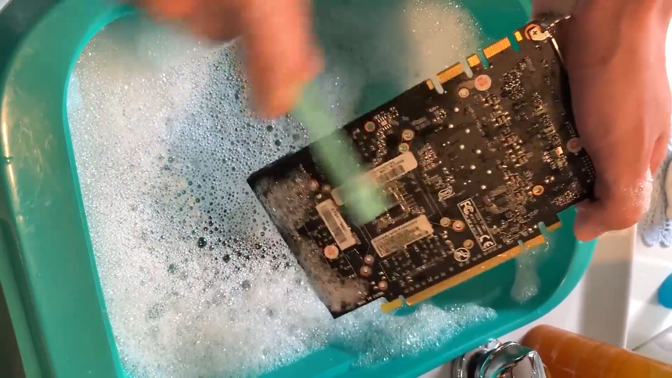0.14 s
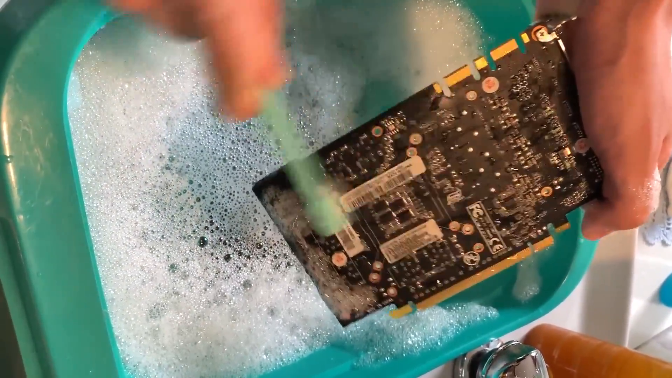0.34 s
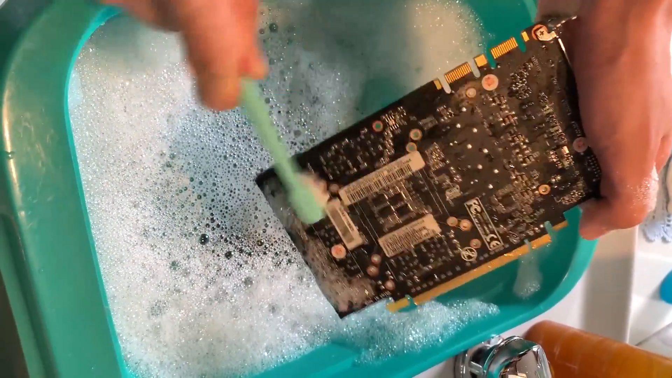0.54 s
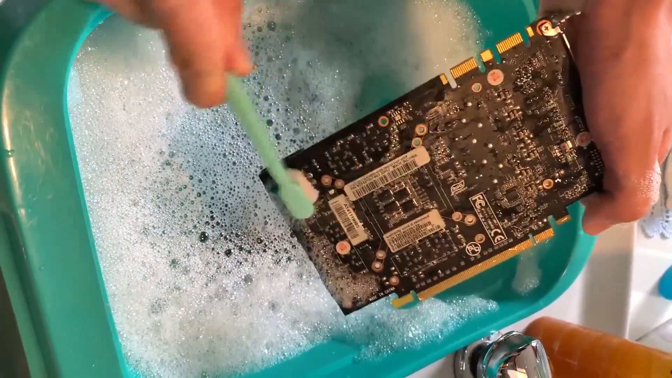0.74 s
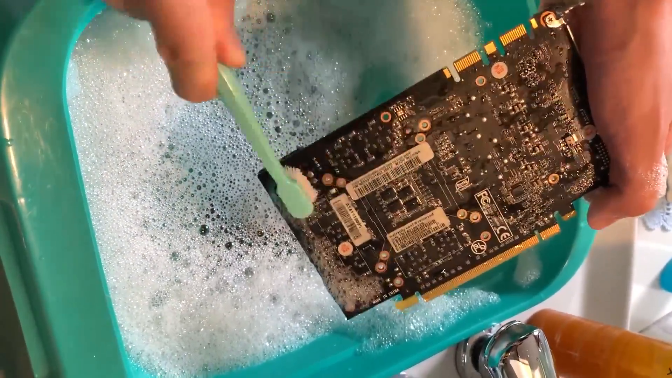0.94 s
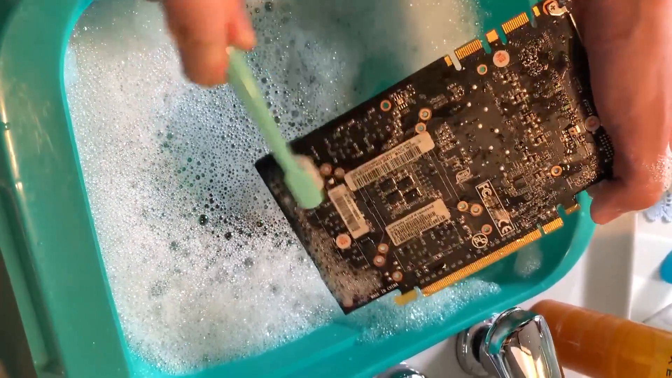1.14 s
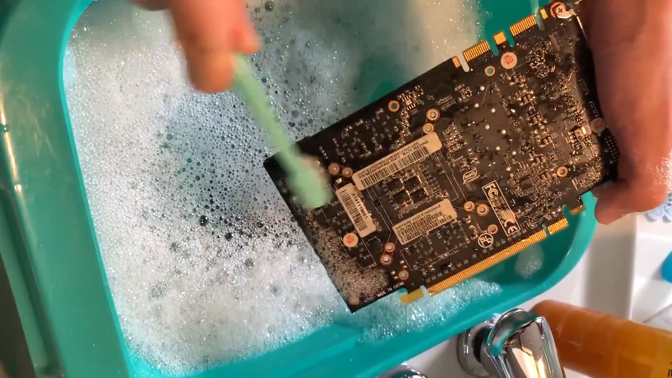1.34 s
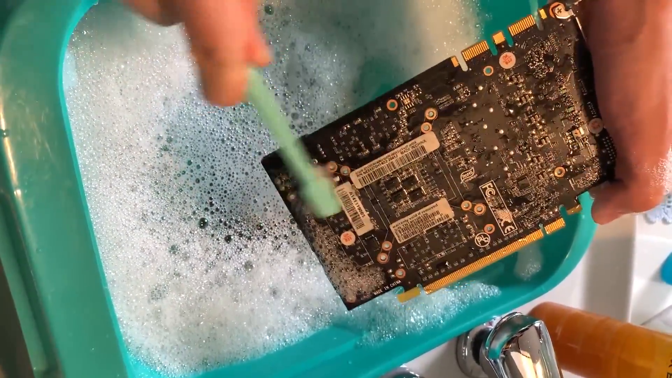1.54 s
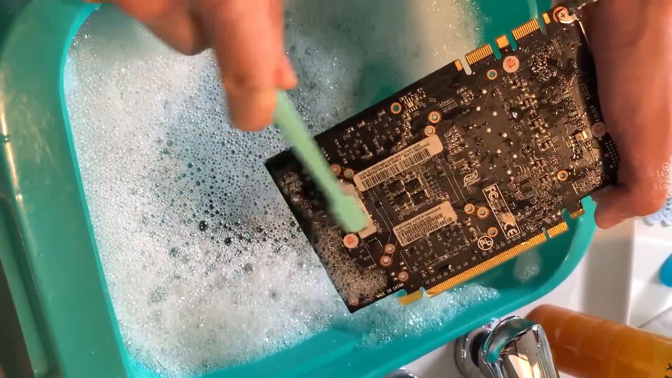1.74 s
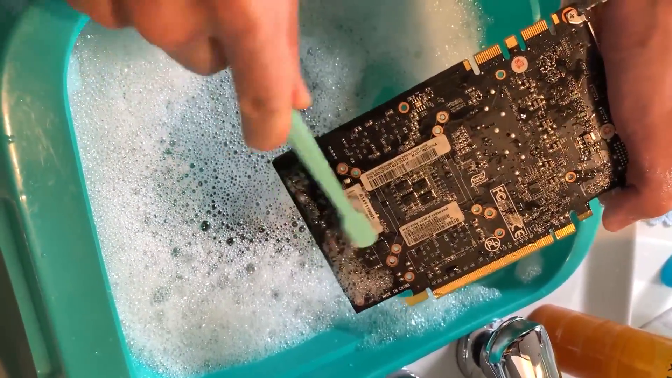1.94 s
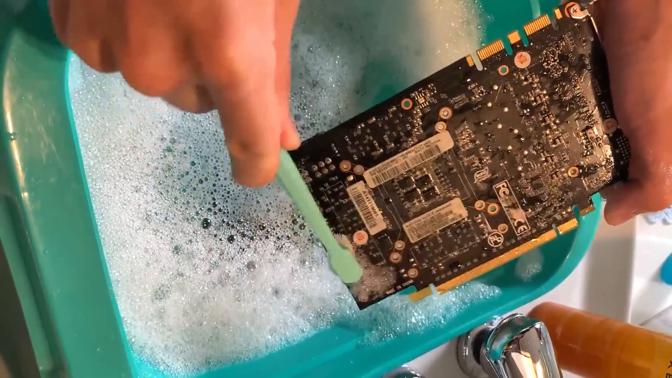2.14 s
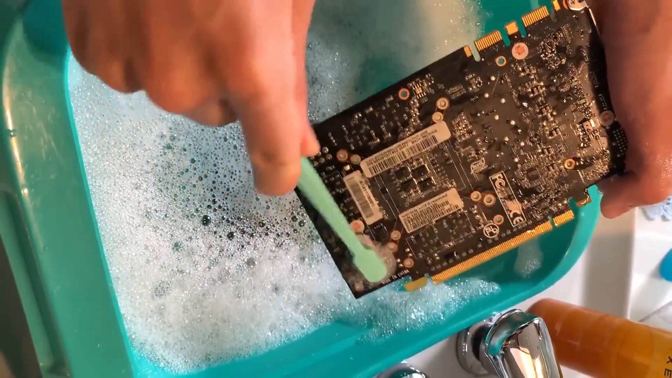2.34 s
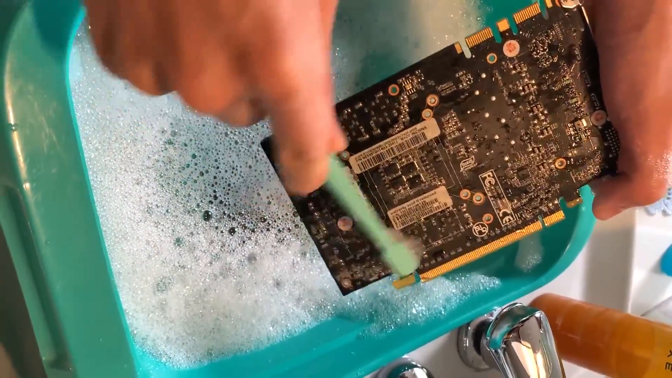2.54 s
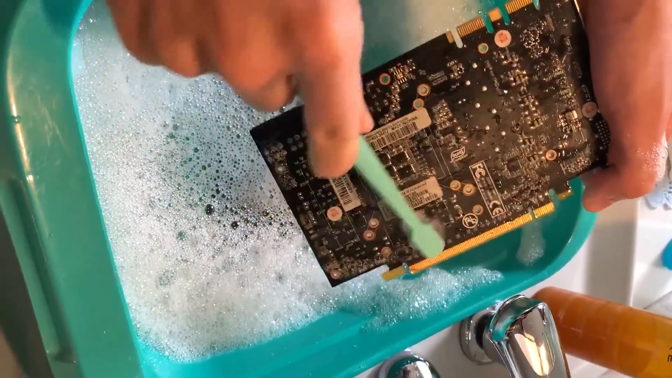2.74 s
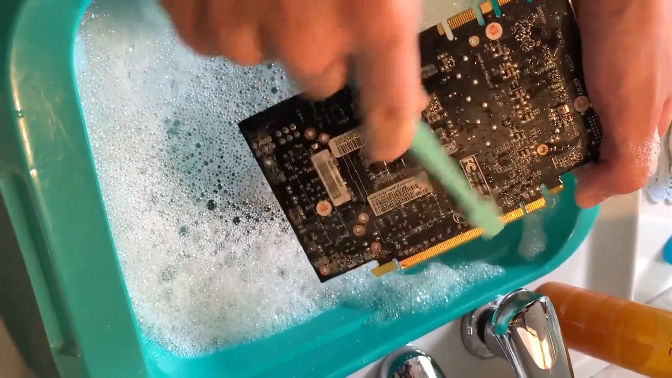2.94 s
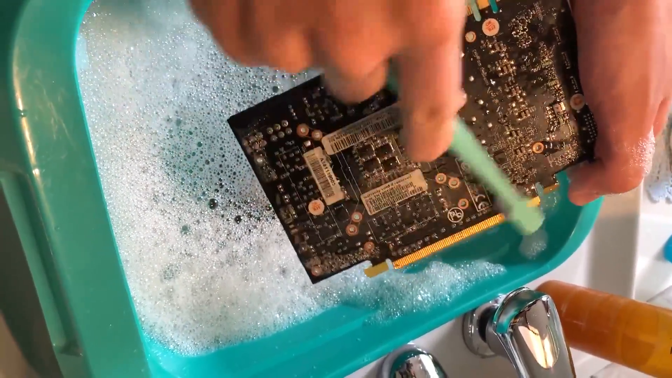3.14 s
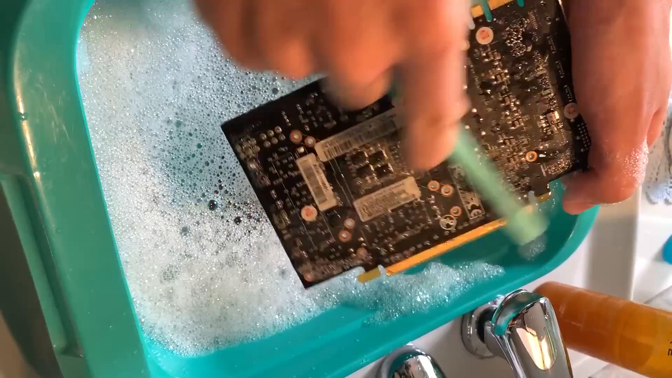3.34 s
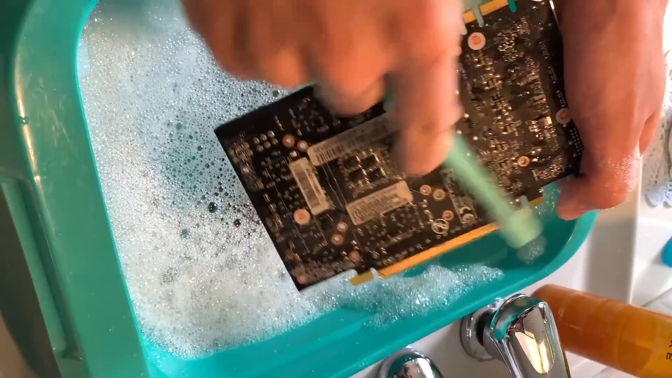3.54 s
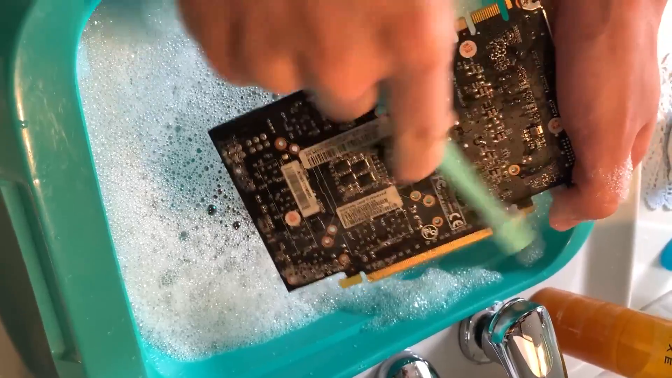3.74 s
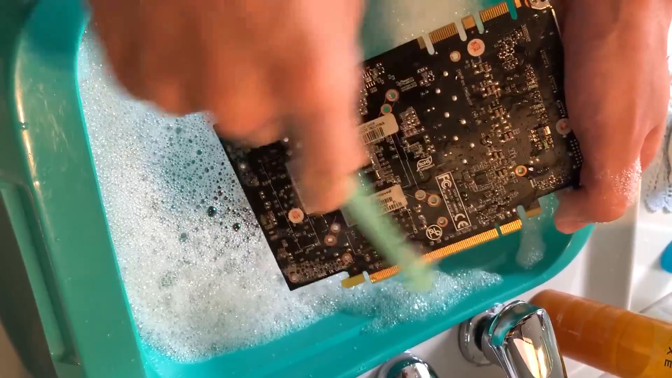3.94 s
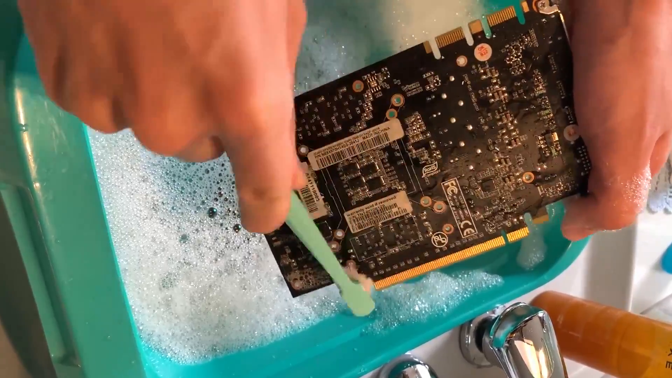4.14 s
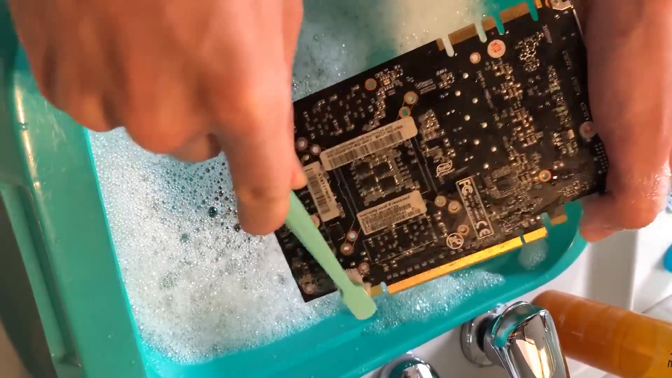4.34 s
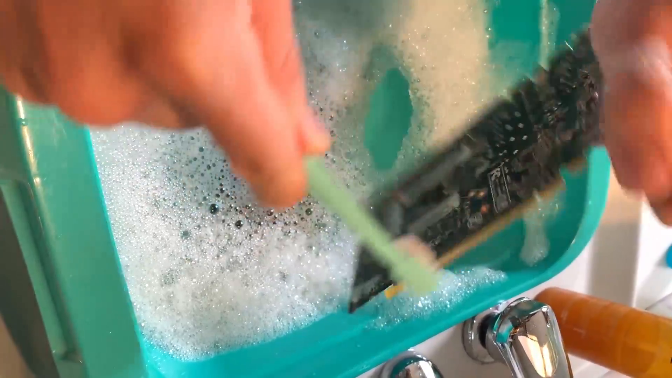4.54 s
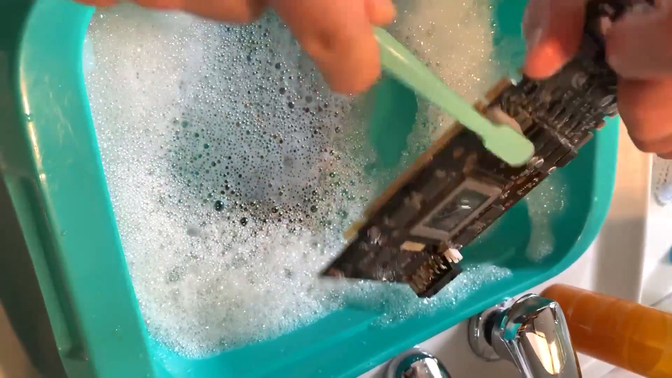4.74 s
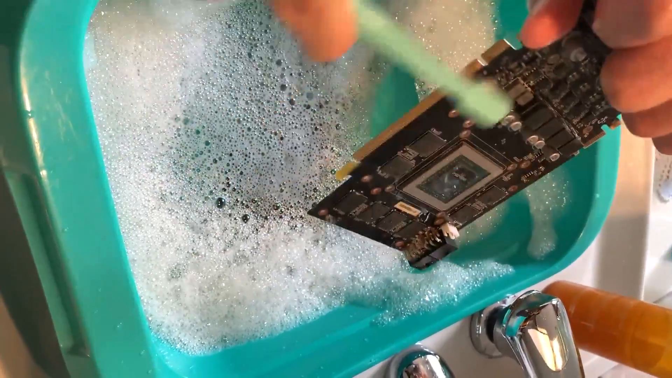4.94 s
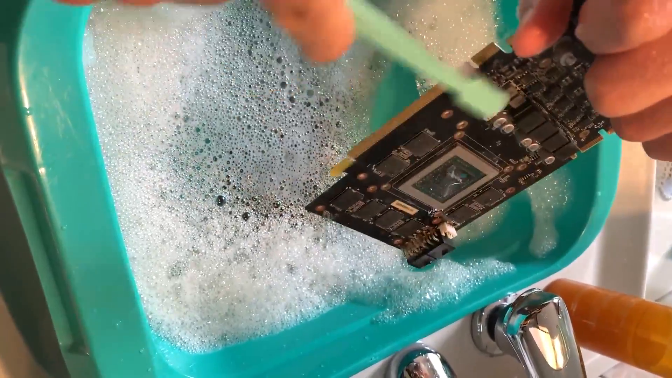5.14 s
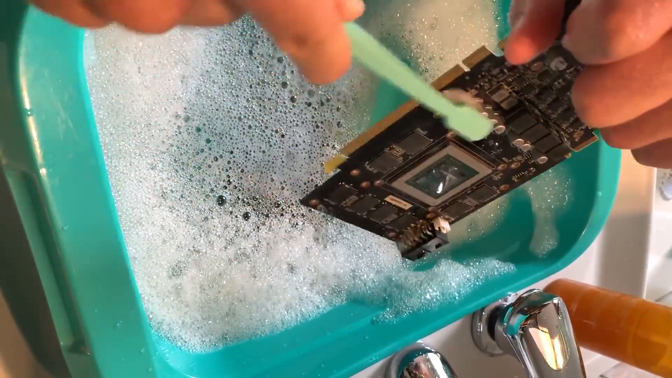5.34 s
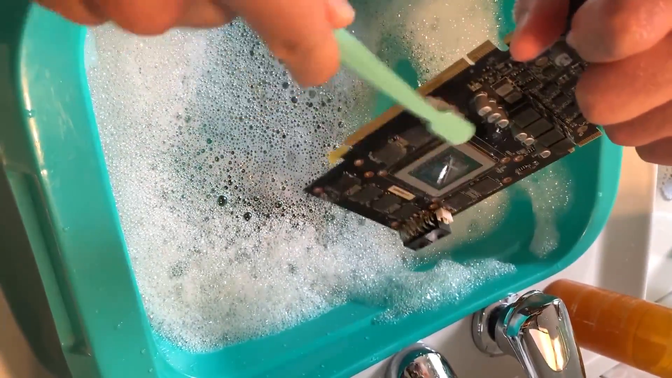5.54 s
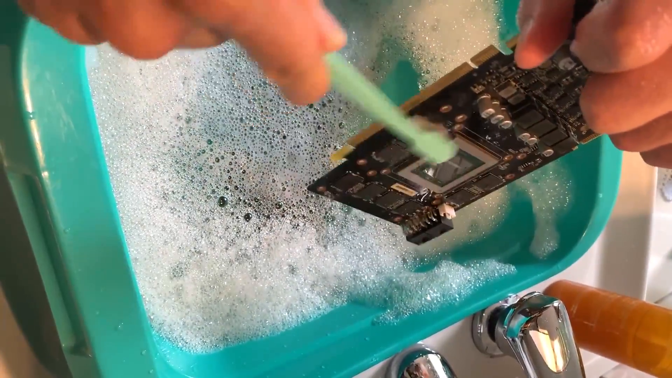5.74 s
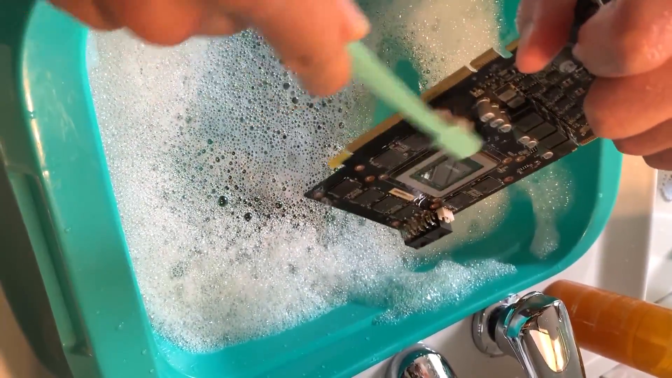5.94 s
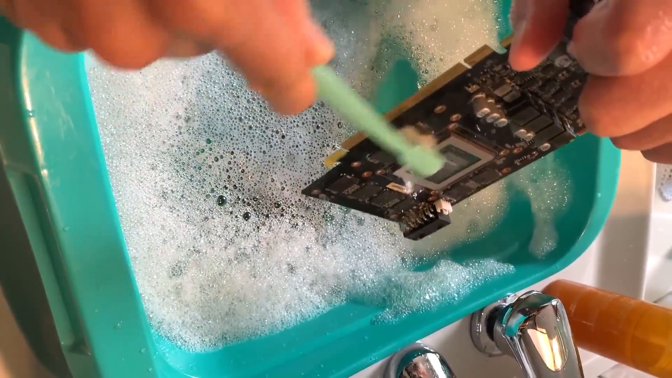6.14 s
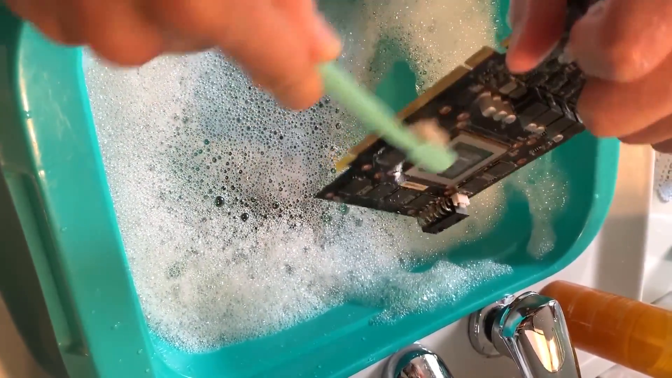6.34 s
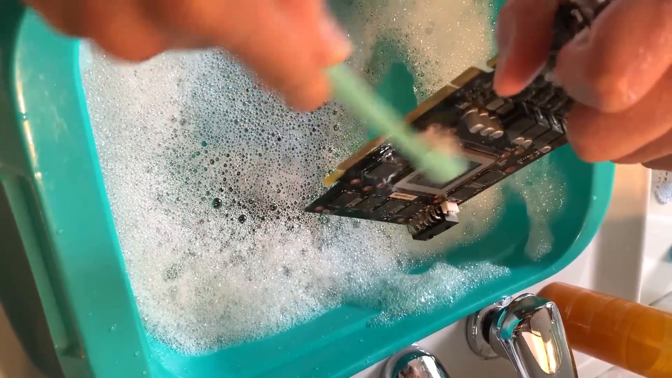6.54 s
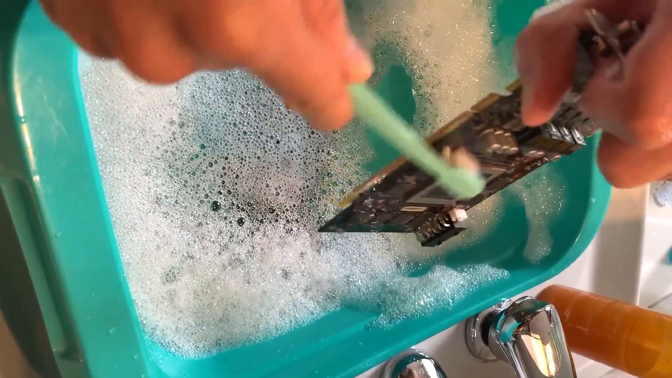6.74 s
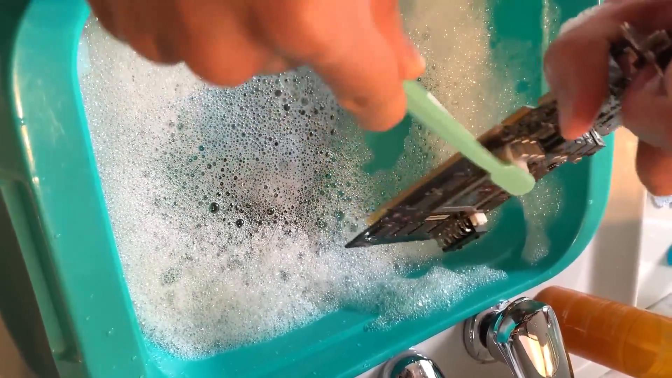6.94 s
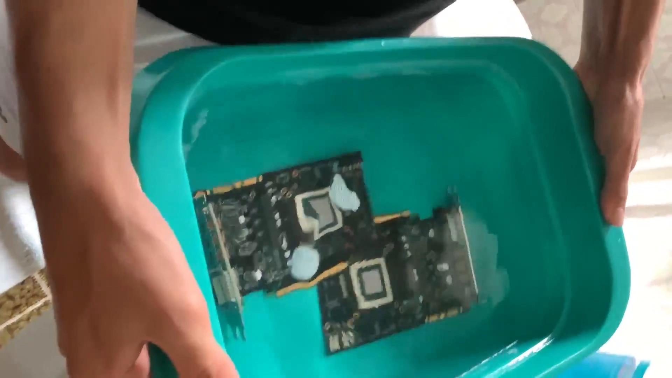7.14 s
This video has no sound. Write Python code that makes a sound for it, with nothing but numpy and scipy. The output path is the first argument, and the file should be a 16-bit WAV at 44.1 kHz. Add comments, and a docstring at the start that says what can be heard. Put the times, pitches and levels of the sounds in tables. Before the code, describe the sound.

Rapid bright bristle scrubbing on a wet circuit board, rasping and ticking, quieter after a turn, cutting to brief silence and gentle basin water.

```python
"""Close up, a plastic toothbrush scrubs a wet circuit board over a basin of suds, ten strokes a second.
It pauses as the board is turned. Bristles flick and hiss, snap over solder pins and set the board rasping.
The brush head knocks, soft bumps thud and faint whistles glide over room tone, hum and bursting foam.
After a moment of silence, water laps quietly in the basin. Two close microphone ports colour it all.
Noise bursts and random clicks make the rubbing and knocks; resonances make the board; glides make the whistles."""
import sys
import numpy as np
from scipy import signal
from scipy.fft import rfft, irfft, next_fast_len
from scipy.io import wavfile
from scipy.ndimage import uniform_filter1d

SR = 44100
rng = np.random.default_rng(int(sys.argv[2]) if len(sys.argv) > 2 else 0)


def put_to_file(sound):
    """Save the sound as 16-bit audio at rate SR, in the file named by the first command-line argument."""
    columns = np.atleast_2d(sound).T  # one column per channel
    safe = np.clip(columns, -1, 1)
    whole_steps = np.round(safe * 32767)
    wavfile.write(sys.argv[1], SR, whole_steps.astype(np.int16))


N = 321486
TIME = np.arange(N) / SR
SILENT_FROM, SILENT_TO = 7.047, 7.128  # s

# colour of bristles letting go, and of the foam: f/Hz, relative level/dB
BRISTLE_SPECTRUM = [(100, -40.5), (1500, -28.5), (3000, -21.5), (4200, -10.5), (5500, -5.5), (7500, -4.5),
                    (11000, -4.5), (14000, -3), (16000, -2)]
# treble tilt of the hiss about 11.5 kHz: t/s, tilt/dB per 6.3 kHz
HISS_TILT = [(0.08, 3.5), (2.25, -4.5), (2.33, -1.5), (2.42, -9.5), (2.51, 3), (2.81, -0.5), (3.0, 6),
             (3.39, 1.5), (4.25, 3.5), (4.4, -4), (4.72, 8.5), (4.95, 1.5), (5.36, 7), (5.46, 4.5),
             (6.58, 1.5), (7.0, 6.5)]


def amp(db):
    """Decibels to gain."""
    return 10 ** (np.asarray(db) / 20)


def unit(x):
    """Scales to rms 1."""
    return x / np.sqrt(np.mean(x ** 2) + 1e-20)


def read(points, hz):
    """Reads a spectrum table on a log-frequency axis."""
    f, value = np.transpose(points)
    return np.interp(np.log(hz + 1), np.log(f + 1), value)


def curve_at(points, s):
    """Reads a control curve at times s."""
    return np.interp(s, *np.transpose(points))


def bells(rows, hz):
    """Sum of bell-shaped peaks and dips, in dB."""
    return sum(db * np.exp(-((hz - f) / width) ** 2) for f, width, db in rows)


def shape(x, response):
    """Filters x by a response given as a function of Hz."""
    size = next_fast_len(len(x) + 4096)
    hz = np.fft.rfftfreq(size, 1 / SR)
    return irfft(rfft(x, size) * response(hz), size)[:len(x)]


def drift(per_s):
    """Smooth random wandering of rms 1."""
    return unit(shape(rng.standard_normal(N), lambda hz: np.exp(-(hz / per_s) ** 2)))


def add(mix, s, sound):
    """Mixes a sound in at time s."""
    part = mix[max(round(s * SR), 0):][:len(sound)]
    part += sound[:len(part)]


def flicks(per_s, spread_db):
    """Random clicks at a mean rate, a few of them large, as when bristles let go or bubbles burst."""
    size = amp(spread_db * np.minimum(rng.exponential(1, N), 4))
    happens = rng.random(N) < per_s / SR
    return unit(size * rng.standard_normal(N) * happens)


def room_tone():
    """The air of the room: steady noise, heaviest in the bass."""
    # f/Hz, relative level/dB
    spectrum = [(22, -17), (50, -2), (130, -2), (200, -7.5), (450, -9.5), (750, -13.5), (1100, -14),
                (2200, -16.5), (3200, -18), (8000, -27.5), (16000, -31.5)]
    return amp(-62.5) * unit(shape(rng.standard_normal(N), lambda hz: amp(read(spectrum, hz))))


def hum():
    """Low steady tones whose phase wavers."""
    # tones: f/Hz, rms level/dB
    tones = [(60.5, -71), (121.5, -72)]
    out = np.zeros(N)
    for f, db in tones:
        waver = 0.4 * drift(per_s=7.4)  # radians
        out += amp(db) * unit(np.sin(2 * np.pi * f * TIME + waver))
    return out


def foam():
    """Suds fizz as bubbles burst one by one."""
    pops = flicks(per_s=1500, spread_db=4)
    return amp(-74.5) * unit(shape(pops, lambda hz: amp(read(BRISTLE_SPECTRUM, hz))))


def lapping_water():
    """Water in the basin: dense small ripples, dull in colour and growing a little louder."""
    # f/Hz, relative level/dB
    spectrum = [(25, 5.5), (70, 8.5), (300, 1), (800, -3), (1300, -7.5), (3000, -11), (7000, -21.5),
                (16000, -40)]
    ripples = flicks(per_s=6000, spread_db=2)
    level_db = np.interp(TIME, [7.15, 7.25], [-57, -53])
    return amp(level_db) * unit(shape(ripples, lambda hz: amp(read(spectrum, hz))))


def background():
    """Room tone, hum and foam up to the end of the silence; from there the lapping water alone."""
    return np.where(TIME < SILENT_TO, room_tone() + hum() + foam(), lapping_water())


def whistles(width_share):
    """Gliding tones that swell and fade, each part clean and part a narrow band of noise."""
    # faint whistles: rms level/dB, fuzziness/0-1, pitch path [(t/s, f/Hz), ..]
    glides = [(-56, .3, [(2.22, 790), (2.3, 825), (2.38, 800)]), (-60, .6, [(2.28, 690), (2.36, 640),
              (2.62, 660)]), (-65, .2, [(4.08, 690), (4.55, 700)]), (-64, .6, [(4.93, 2080), (5.05, 2020),
              (5.25, 2650), (5.36, 2450)]), (-63, .25, [(5.55, 2000), (5.68, 2350), (5.76, 3030),
              (5.88, 2600), (5.96, 2450)]), (-62, .05, [(6.08, 2420), (6.19, 2900), (6.26, 3150),
              (6.36, 3000), (6.48, 2150), (6.57, 1700), (6.73, 2350)])]
    fade_s = .06
    out = np.zeros(N)
    for db, fuzz, path in glides:
        t = np.arange(path[0][0], path[-1][0], 1 / SR)
        hz = curve_at(path, t)
        width = width_share * hz.mean()
        a, b = (unit(shape(rng.standard_normal(len(t)), lambda f: np.exp(-(f / width) ** 2)))
                for _ in range(2))
        body = np.sqrt(2 * (1 - fuzz)) + np.sqrt(fuzz) * (a + 1j * b)
        tone = (body * np.exp(2j * np.pi * np.cumsum(hz) / SR)).real
        fades = signal.windows.tukey(len(t), 2 * fade_s * SR / len(t))
        add(out, t[0], amp(db) * tone * fades)
    return out


def bumps():
    """Soft hollow thuds and handling rumble: resonant low noise that swells and dies."""
    # t/s, level at full swell/dB, rise/s, decay/s, upper edge f/Hz
    thuds = [(0, -55.5, 0.064, 0.13, 450), (1.778, -40.5, 0.0015, 0.032, 615),
             (1.819, -44.5, 0.033, 0.036, 96), (3.551, -56.5, 0.33, 0.26, 420), (3.87, -52, 0.05, 0.17, 99),
             (5.281, -45, 0.018, 0.13, 158), (5.15, -51.5, 0.14, 0.23, 172)]
    # hollow resonances: f/Hz, width/Hz, gain/dB
    hollow = [(58, 19, 13), (122.7, 20, 14), (316, 97, 8), (560, 38, 15)]
    t, out = np.arange(SR) / SR, np.zeros(N)
    for s, db, rise, decay, edge_hz in thuds:
        def colour(hz):
            bass_cut = hz ** 3 / (hz ** 3 + 45 ** 3)
            return amp(bells(hollow, hz)) * bass_cut / (1 + (hz / edge_hz) ** 4)
        noise = shape(rng.standard_normal(len(t)), colour)
        swell = np.minimum(t / rise, 1) * np.exp(-np.maximum(t - rise, 0) / decay)
        add(out, s, amp(db) * unit(noise * swell) * np.sqrt(np.mean(swell ** 2)))
    return out


def through_board(drive, direct, ring_db):
    """The board passes a broad spectrum and rings with the modes that the grip leaves free."""
    # modes of the board held flat: f/Hz, width/Hz, relative level/dB
    flat_modes = [(705, 28, -4.5), (800, 57, 5), (1018, 31, 2), (1316, 63, 0.5), (1670, 69, -8.5),
                  (1823, 51, 0.5), (2390, 150, -4), (2820, 140, -8.5), (3645, 210, 2)]
    # modes held on edge, after the turn: f/Hz, width/Hz, relative level/dB
    edge_modes = [(751, 74, 8), (758, 39, -4), (1467, 70, 7.5), (1650, 47, -1.5), (2510, 160, 4),
                  (3370, 70, 0.5), (3880, 290, -3)]
    turned_at = 4.6  # s
    out = np.zeros(N)
    for modes, held in ((flat_modes, TIME < turned_at), (edge_modes, TIME >= turned_at)):
        ring = lambda hz: sum(amp(db) / (1 + 2j * (hz - f) / width) for f, width, db in modes)
        out += shape(drive * held, lambda hz: amp(read(direct, hz)) + amp(ring_db) * ring(hz))
    return out


def bursts(rows, decay_s):
    """One short crunch of noise for each row of time and level."""
    t, out = np.arange(SR // 30) / SR, np.zeros(N)
    for s, db in rows:
        envelope = t / decay_s * np.exp(1 - t / decay_s)
        add(out, s - decay_s / 2, amp(db) * rng.standard_normal(len(t)) * envelope)
    return out


def knocks():
    """The hard brush head strikes the board and sets it ringing."""
    # t/s, relative level/dB
    hits = [(.478, -44), (.803, -48), (2.399, -44), (2.414, -39), (3.356, -47), (3.467, -46), (3.539, -46),
            (4.871, -44), (5.123, -51), (5.458, -43), (6.357, -37), (6.586, -30), (6.799, -43)]
    # broad sound of the blow: f/Hz, relative level/dB
    crack = [(100, -14), (450, -3), (1000, -6), (3000, -6), (4500, -2), (7000, -3), (16000, -9)]
    return amp(6) * through_board(bursts(hits, decay_s=.0012), crack, ring_db=-3)


def snaps():
    """A whole tuft catches on a pin and springs free."""
    # t/s, relative level/dB
    releases = [(0.0528, -9), (0.167, -16), (0.2618, -17), (0.2818, -13), (0.3785, -16), (0.4763, -18),
                (0.5771, -19), (0.6963, -13), (0.7901, -16), (0.8934, -19), (0.9936, -16), (1.1014, -18),
                (2.0123, -25), (2.4174, -20), (2.7521, -24), (2.9522, -22), (3.019, -23), (3.0904, -19),
                (3.1627, -21), (3.1812, -17), (3.487, -17), (3.5374, -21), (3.8935, -17), (3.9579, -16),
                (4.0233, -18), (4.1974, -24), (5.5363, -22), (5.6444, -21), (5.8491, -20), (6.0462, -19),
                (6.2946, -20), (6.5844, -16)]
    return amp(-3.5) * shape(bursts(releases, decay_s=.001), lambda hz: amp(read(BRISTLE_SPECTRUM, hz)))


def stroke_gain(power, creep_db):
    """Loudness of the rubbing: the brush speeds up and slows to each turn, where the bristles still creep."""
    # strokes, alternately forth and back, each until the next or until a lift: t/s, relative level/dB
    strokes = [(0.021, -23.5), (0.142, -27.0), (0.246, -24), (0.352, -31), (0.457, -27.5), (0.555, -28.0),
               (0.669, -25.0), (0.772, -25.5), (0.873, -25.5), (0.979, -26.0), (1.077, -31.0),
               (1.176, -31.5), (1.27, -33.5), (1.363, -31), (1.443, -38), (1.543, -34.5), (1.629, -34.5),
               (1.73, -31.0), (1.806, -37), (1.907, -34), (2.003, -35.5), (2.102, -31.0), (2.206, -38),
               (2.283, -38.5), (2.378, -30.5), (2.468, -37.5), (2.544, -34.5), (2.677, -32), (2.747, -29.5),
               (2.876, -33.0), (2.929, -31.5), (3.062, -30.5), (3.137, -29.5), (3.266, -26), (3.336, -29),
               (3.445, -28.5), (3.521, -30), (3.633, -30), (3.709, -29.5), (3.807, -29.5), (3.943, -33.5),
               (3.997, -28.0), (4.127, -33.5), (4.177, -30.5), (4.274, -36.5), (4.327, -40), (4.472, -42),
               (4.703, -40), (4.891, -35.0), (5.007, -38.5), (5.112, -30.5), (5.205, -31.5), (5.307, -28.5),
               (5.404, -33.5), (5.509, -30), (5.603, -32), (5.698, -32), (5.799, -31), (5.915, -39.5),
               (6.006, -33.0), (6.12, -35), (6.234, -39), (6.423, -39.0), (6.527, -34), (6.637, -34.5),
               (6.742, -38), (6.835, -40), (6.952, -40)]
    # the brush leaves the board: t/s
    lifts = [4.53, 4.739, 6.396, 6.61, 7.05]
    crest, creep_spread = 0.37, 0.9  # shares of the stroke: moment of top speed, spread of the creep
    t = TIME[::32]
    energy = np.zeros(len(t))
    stops = np.array([s for s, _ in strokes] + lifts)
    for start, db in strokes:
        progress = (t - start) / (stops[stops > start].min() - start)
        speed = abs(np.sin(np.pi * np.interp(progress, [0, crest, 1], [0, .5, 1])))
        creep = amp(creep_db) * np.exp(-((progress - .5) / creep_spread) ** 2)
        energy += amp(2 * db) * (speed ** (2 * power) + creep ** 2)
    return np.interp(TIME, t, np.sqrt(energy))


def shifting(x, tilt_db, patchy_db, size):
    """Peaks and dips in the colour come and go as tufts pass over different parts."""
    hz, t, z = signal.stft(x, SR, nperseg=size)
    patches = rng.standard_normal(z.shape)
    patches = uniform_filter1d(patches, size=2048 // size + 1, axis=1)  # smooth in time
    patches = unit(uniform_filter1d(patches, size=4, axis=0))  # smooth in frequency
    patches = np.minimum(patches, 1.5)
    slope = np.clip((hz - 11500) / 6300, -.75, .55)[:, None]
    z = z * amp(slope * np.interp(t, TIME, tilt_db) + patchy_db * patches)
    return signal.istft(z, SR, nperseg=size)[1][:N]


def scrubbing():
    """Bristles let go in clumps; they hiss in the air and rasp through the board."""
    # rasp against hiss, as the brush moves over the board: t/s, relative level/dB
    rasp_level = [(0.08, -19.5), (1.49, -23.5), (2.42, -12), (2.51, -17.5), (3.3, -19.5), (3.39, -12),
                  (3.88, -16), (3.97, -13.5), (4.06, -17.5), (4.5, -8), (5.36, -21.0), (5.46, -12),
                  (5.56, -20.5), (6.06, -22.5), (6.33, -16.5), (7.0, -16.5)]
    # broad sound passed by the board: f/Hz, relative level/dB
    rasp_spectrum = [(60, -9.5), (250, -12), (500, -17), (800, -9.5), (2000, -2), (3800, -2), (6000, -17.5),
                     (16000, -12)]
    # loudness follows a power of brush speed; creep is relative to the crest of the stroke
    hiss_gain = stroke_gain(power=1.48, creep_db=-15)
    rasp_gain = stroke_gain(power=1.38, creep_db=-11) * amp(curve_at(rasp_level, TIME))
    tufts = unit(amp(1.0 * drift(per_s=230) + 1.7 * drift(per_s=47)))
    hiss = tufts * flicks(per_s=28000, spread_db=1.6)
    hiss = shape(hiss, lambda hz: amp(read(BRISTLE_SPECTRUM, hz)))
    hiss = unit(shifting(hiss, curve_at(HISS_TILT, TIME), patchy_db=4.5, size=512))
    scratches = flicks(per_s=9000, spread_db=2.2)
    rasp = through_board(rasp_gain * tufts * scratches, rasp_spectrum, ring_db=-1.5)
    rasp = shifting(rasp, np.zeros(N), patchy_db=4.5, size=1024)
    return amp(-0.04) * hiss_gain * hiss + amp(3.0) * rasp


def scattered(x, t60):
    """Sound thrown back by basin and walls: the same spectrum, lingering, with random phase."""
    z = signal.stft(x, SR, nperseg=256)[2]
    keep = amp(-2 * 60 * 128 / SR / t60)  # power kept per hop of 128 samples; t60 in s
    power = signal.lfilter([1 - keep], [1, -keep], abs(z) ** 2, axis=1)
    phase = np.exp(2j * np.pi * rng.random(z.shape))
    return signal.istft(np.sqrt(2 * power) * phase, SR, nperseg=256)[1][:N]


def scene():
    """Both ports share the direct sound; each gets its own scattered sound."""
    # scattered sound that differs between the ports: f/Hz, level re the common sound/dB
    diffuse = [(60, -9), (200, -8), (450, -3), (1100, -3), (1800, -10), (2700, 8), (4700, -33), (5600, 3.5),
               (6800, -8.5), (8000, -26.5), (10000, -39), (16000, -20)]
    # bands in which the ports hear the brush most differently: f/Hz, width/Hz, relative level/dB
    side_bands = [(8300, 600, -13), (10480, 200, -9), (11600, 180, -8), (14530, 130, -12),
                  (15600, 170, -12)]
    brush = scrubbing() + snaps()
    direct = brush + knocks() + bumps() + whistles(width_share=0.09) + background()

    share = lambda hz: amp(read(diffuse, hz))
    common = shape(direct, lambda hz: 1 / np.hypot(1, share(hz)))
    own_share = lambda hz: share(hz) / np.hypot(1, share(hz))
    own = np.array([shape(scattered(direct, t60=0.094), own_share) for _ in range(2)])

    # the duller a stroke, the wider its treble spreads between the ports
    spread = amp(-1.1 * curve_at(HISS_TILT, TIME))
    bands = lambda hz: sum(amp(db) * np.exp(-((hz - f) / width) ** 2) for f, width, db in side_bands)
    side = amp(4) * shape(scattered(brush * spread, t60=.04), bands)
    return common + own + np.array([side, -side])


def record(dry):
    """Port colour and phase, a moment of silence, then the band limit."""
    # peaks and dips of the microphone: f/Hz, width/Hz, gain/dB
    port = [(8370, 97, 7), (8930, 114, -29), (9640, 190, 4), (12600, 100, 8), (13060, 270, -1.5),
            (14160, 130, 5.5)]
    # phase of the right port against the left: f/Hz, phase/radians
    port_phase = [(0, 0), (1400, 0), (2150, -.4), (2400, -1.45), (3400, -1.35), (4000, -2.1), (4550, -3.05),
                  (4950, -3.3), (5450, -4.3), (6450, -6), (7000, -6.35), (7480, -7.2), (7800, -6.5),
                  (8200, -6.7), (8500, -6.28)]
    colour = lambda hz: amp(bells(port, hz))
    turn = lambda hz: np.exp(1j * np.interp(hz, *np.transpose(port_phase)))
    left = shape(dry[0], colour)
    right = shape(dry[1], lambda hz: colour(hz) * turn(hz))
    live = 1. * ((TIME < SILENT_FROM) | (TIME > SILENT_TO))
    live = uniform_filter1d(live, size=200)  # soft edges
    low_pass = signal.firwin(511, 15850, window=("kaiser", 9), fs=SR)  # edge in Hz
    return signal.oaconvolve(np.array([left, right]) * live, low_pass[None], "same", axes=1)


dry = scene()
out = record(dry)
put_to_file(out)
```